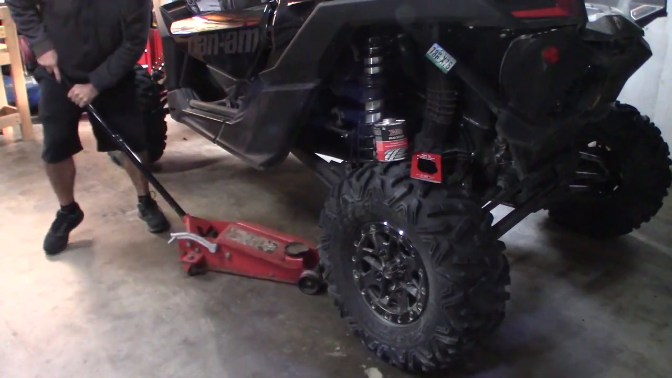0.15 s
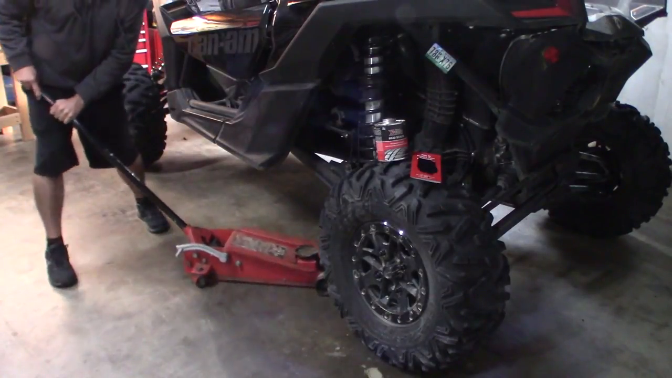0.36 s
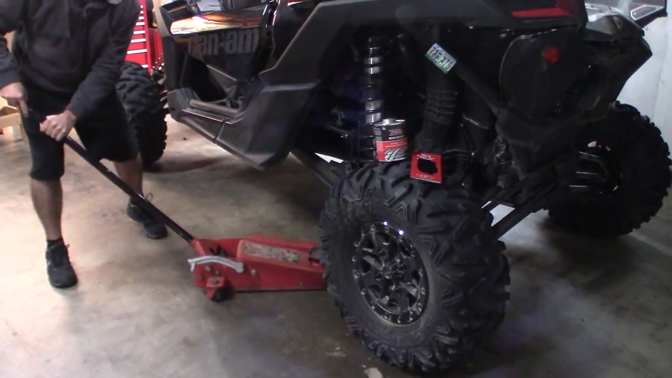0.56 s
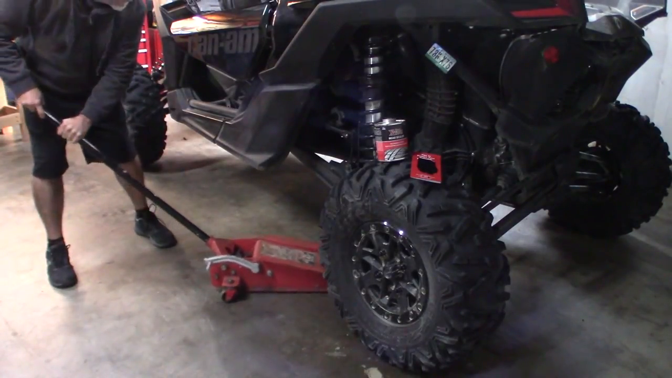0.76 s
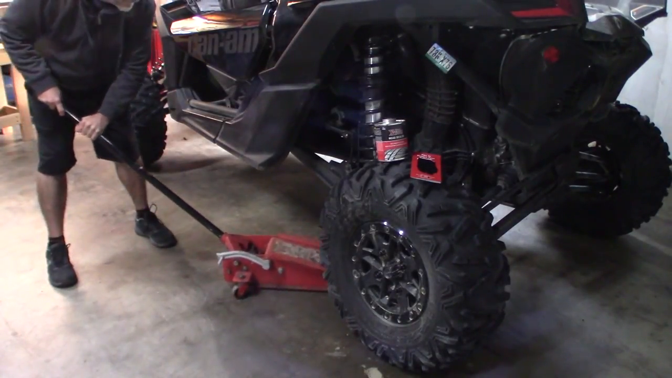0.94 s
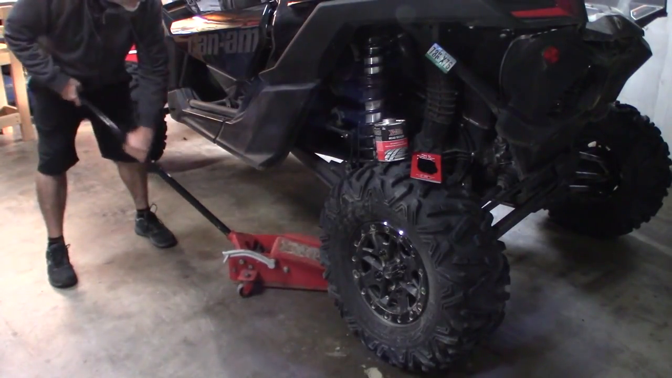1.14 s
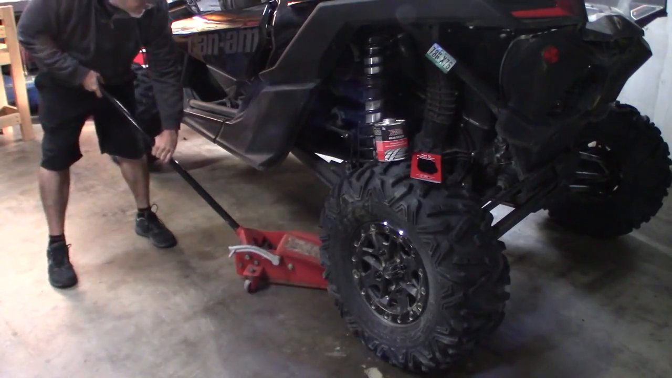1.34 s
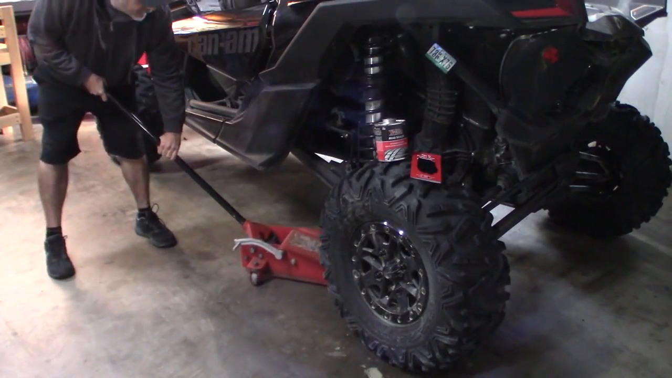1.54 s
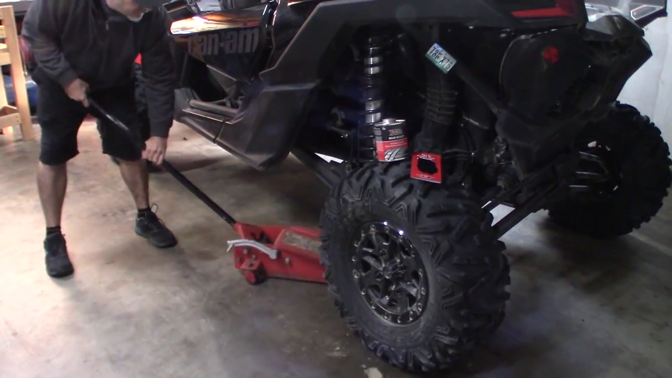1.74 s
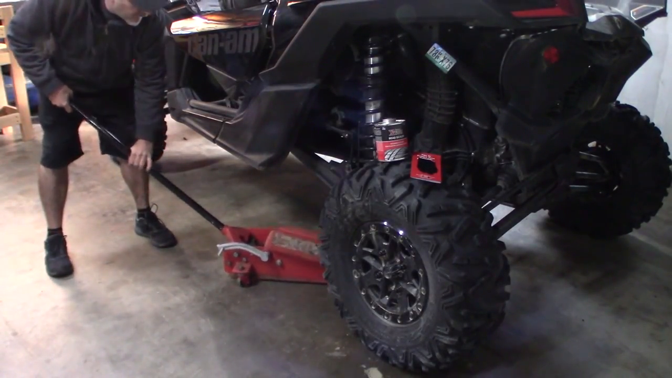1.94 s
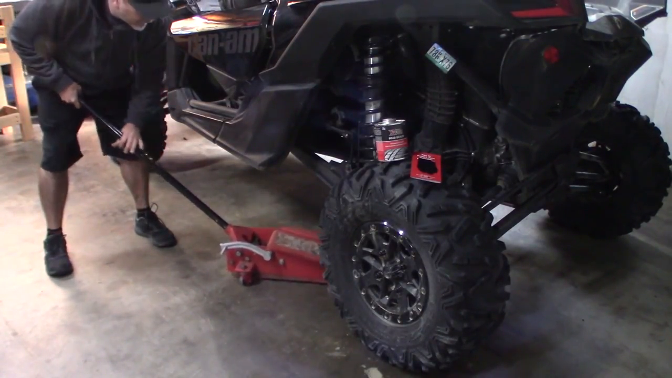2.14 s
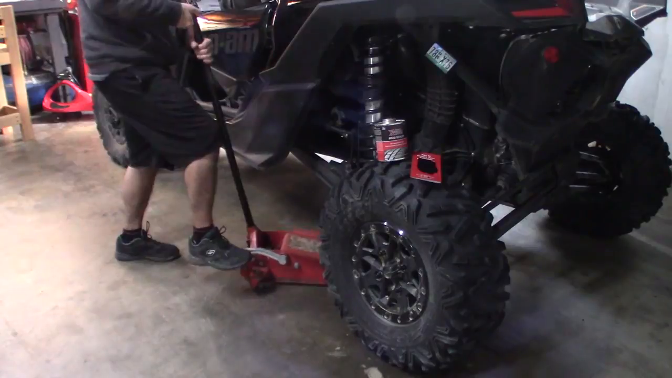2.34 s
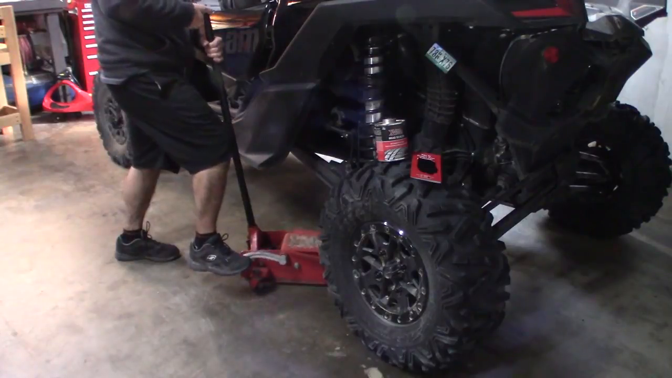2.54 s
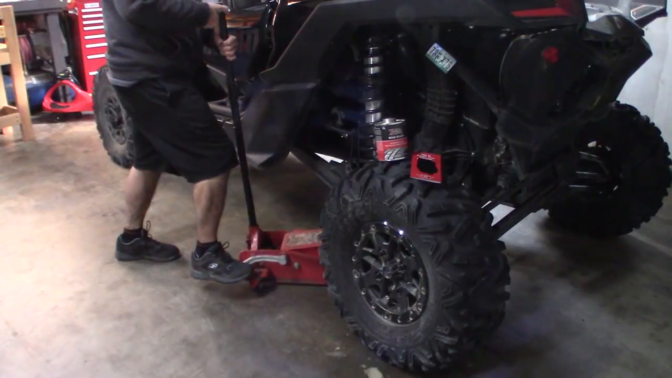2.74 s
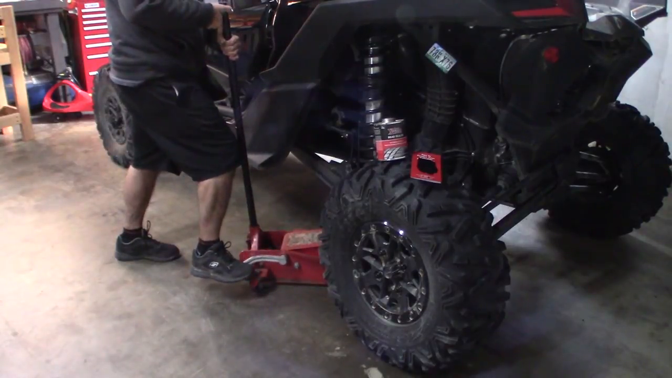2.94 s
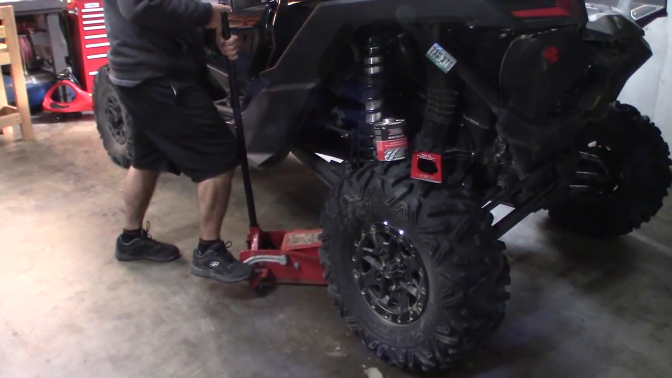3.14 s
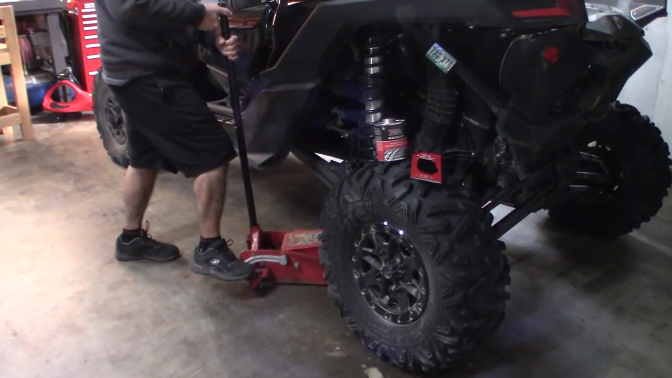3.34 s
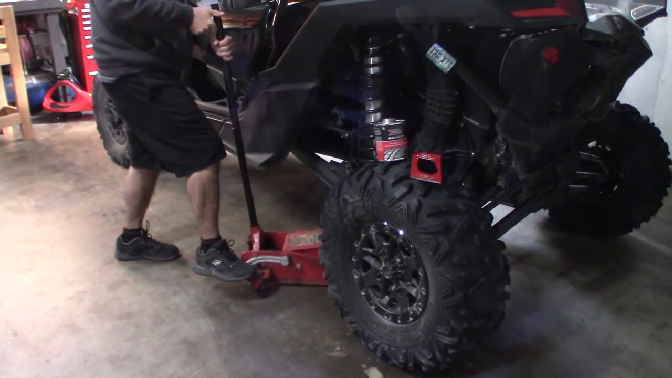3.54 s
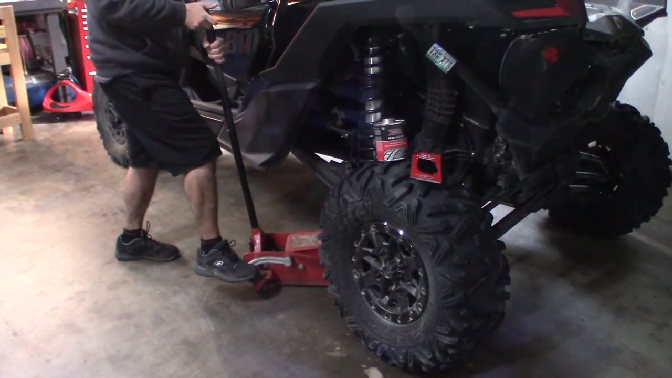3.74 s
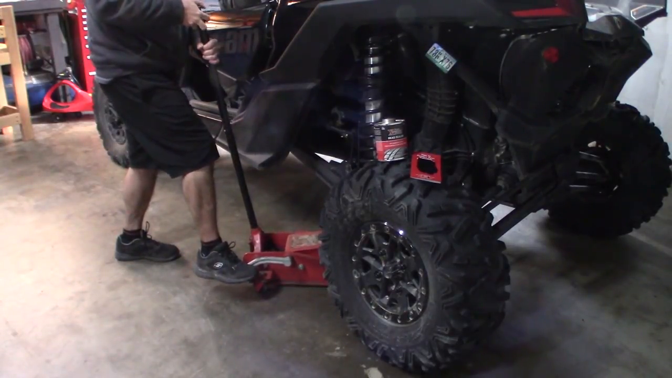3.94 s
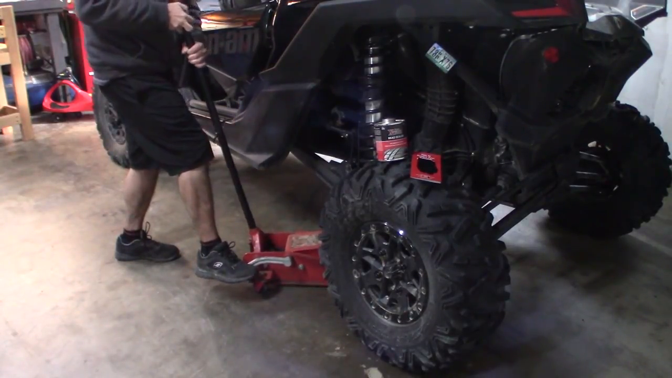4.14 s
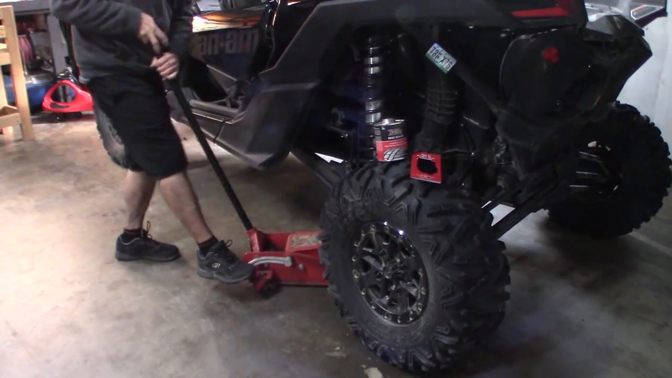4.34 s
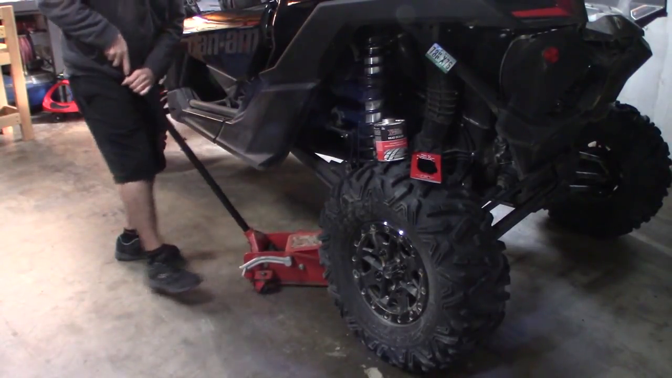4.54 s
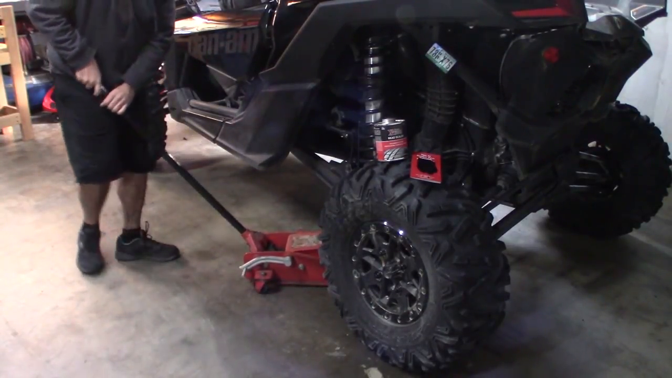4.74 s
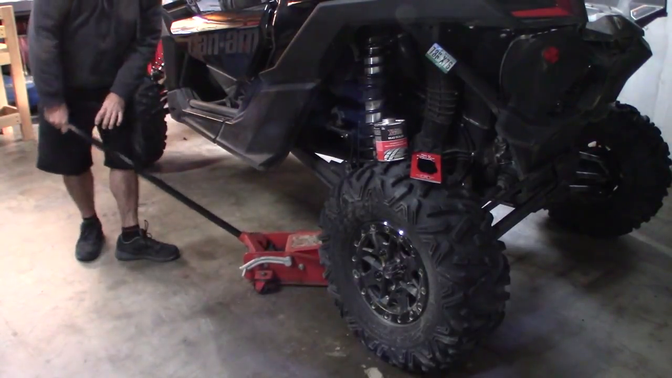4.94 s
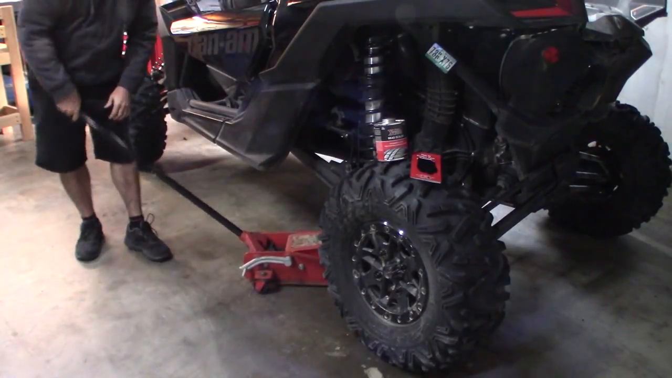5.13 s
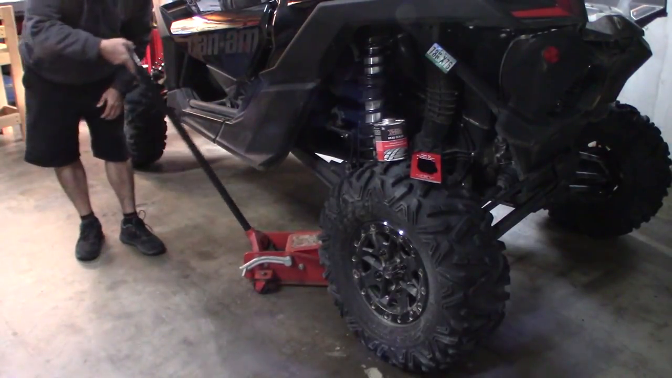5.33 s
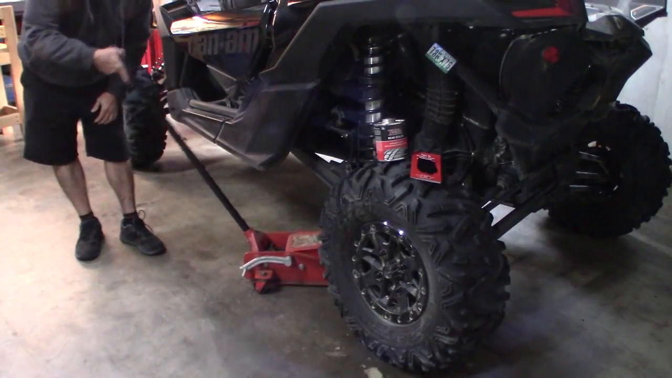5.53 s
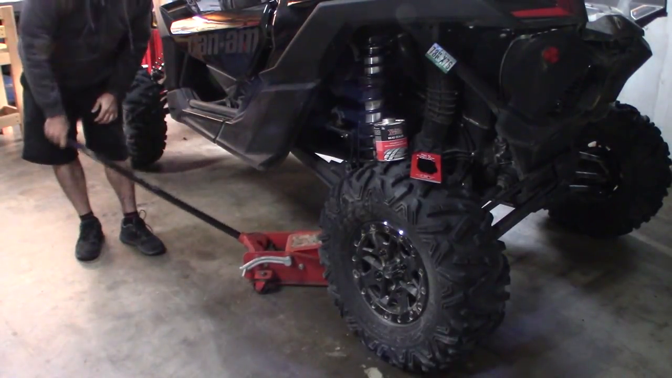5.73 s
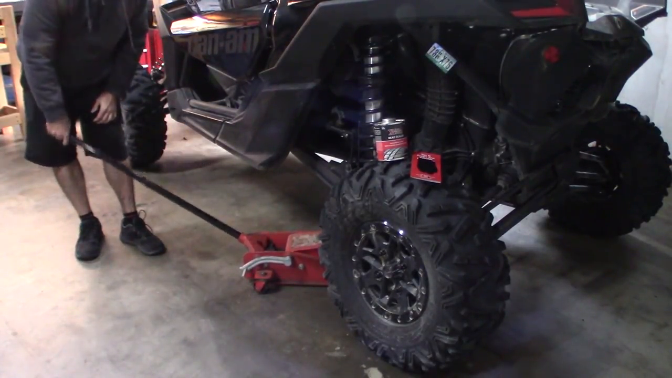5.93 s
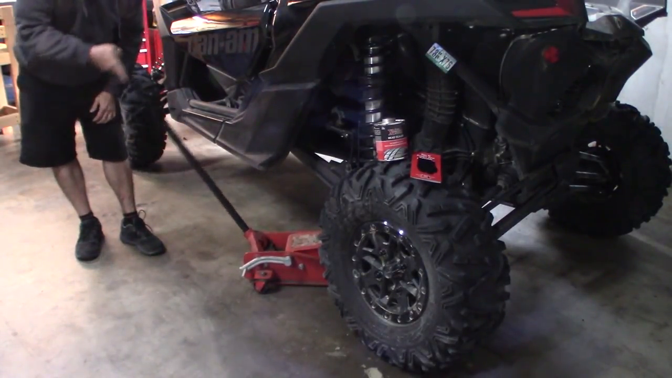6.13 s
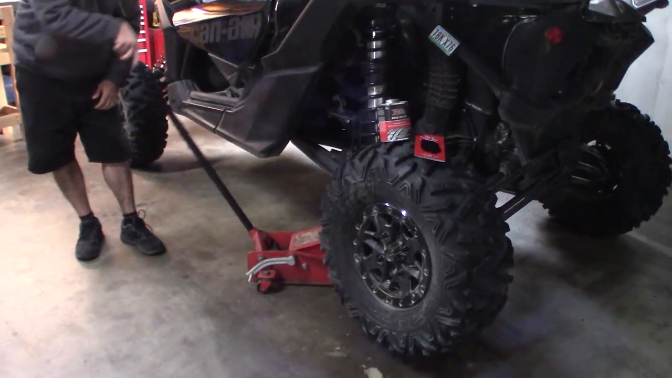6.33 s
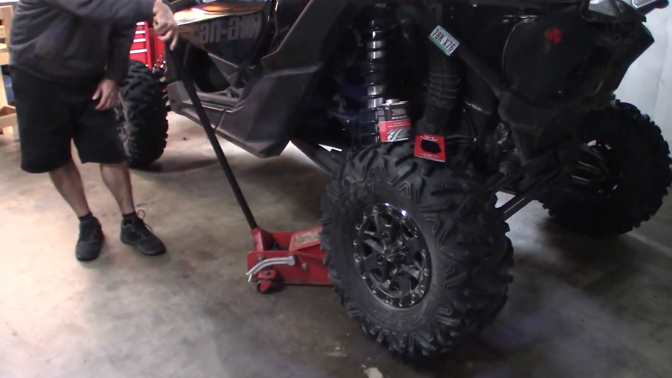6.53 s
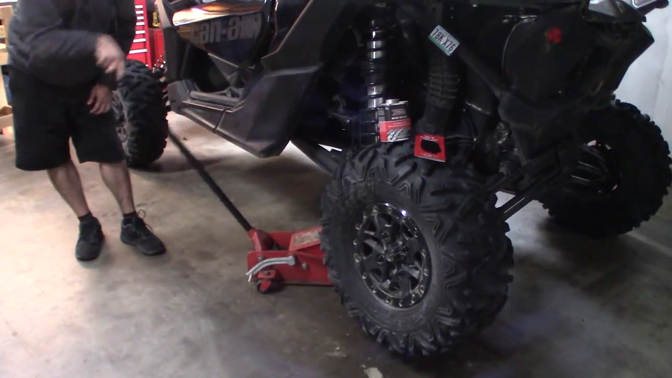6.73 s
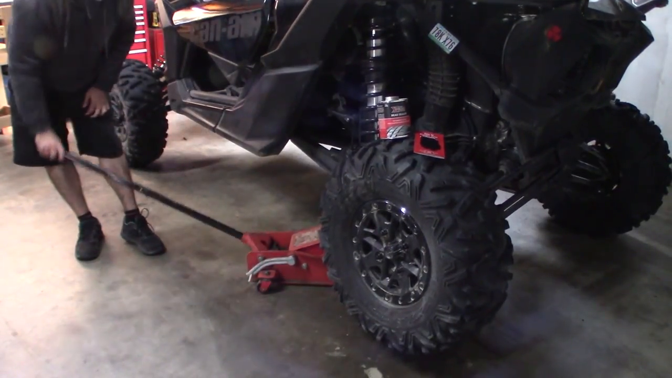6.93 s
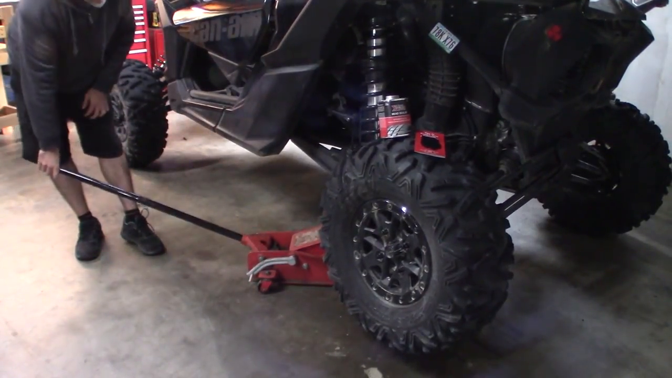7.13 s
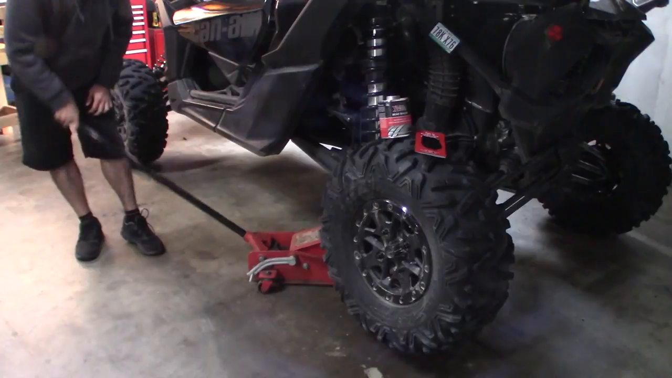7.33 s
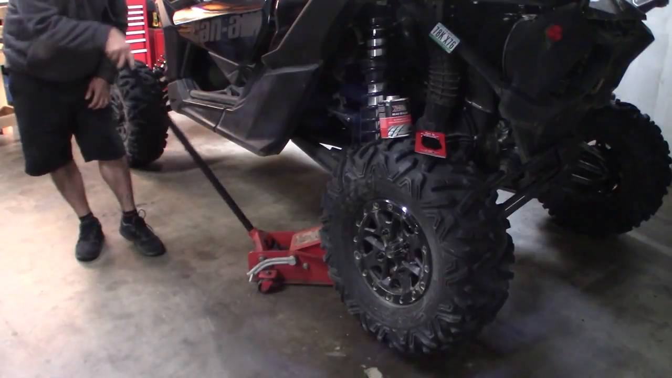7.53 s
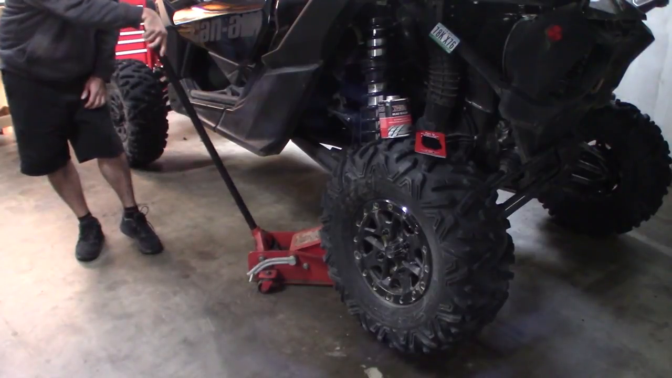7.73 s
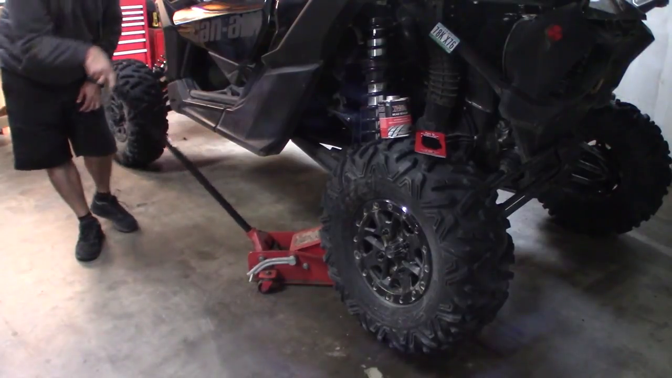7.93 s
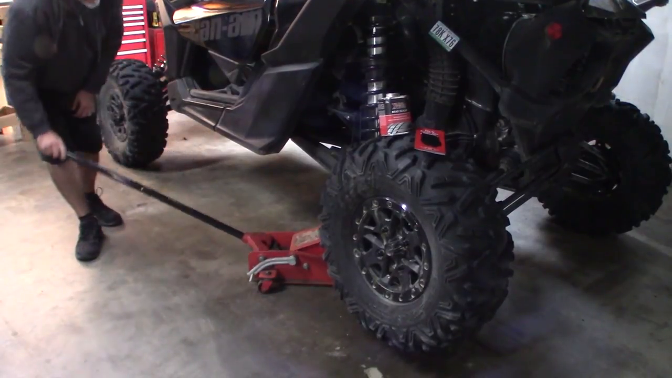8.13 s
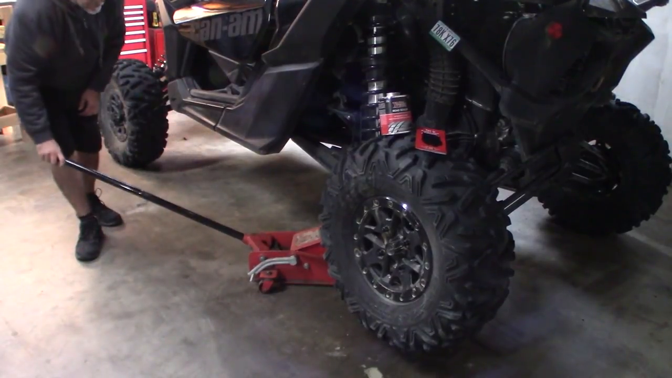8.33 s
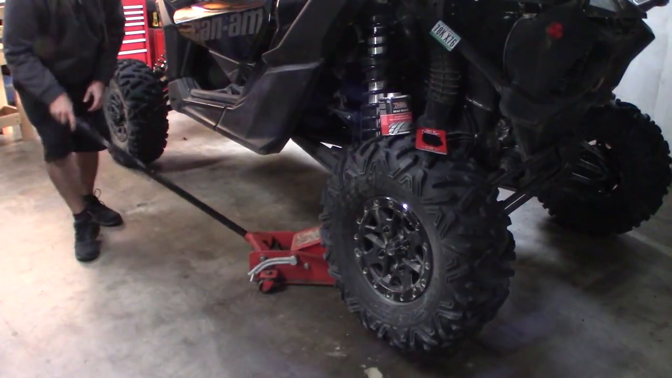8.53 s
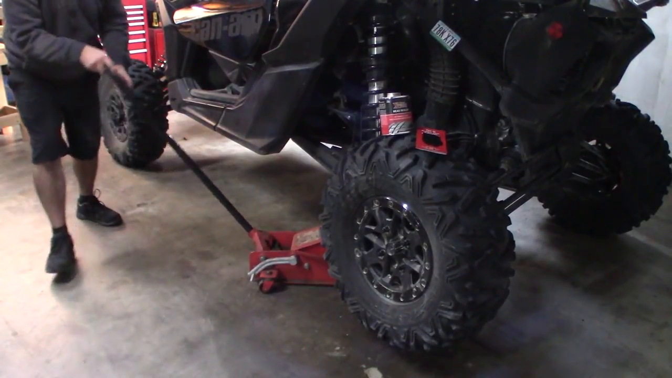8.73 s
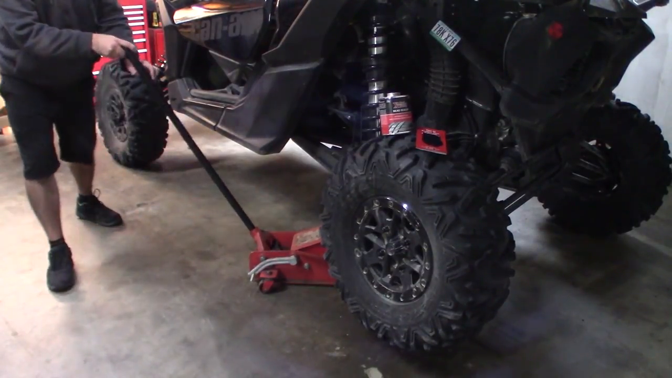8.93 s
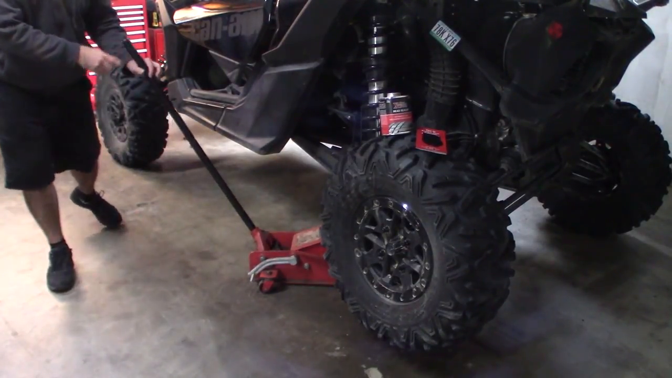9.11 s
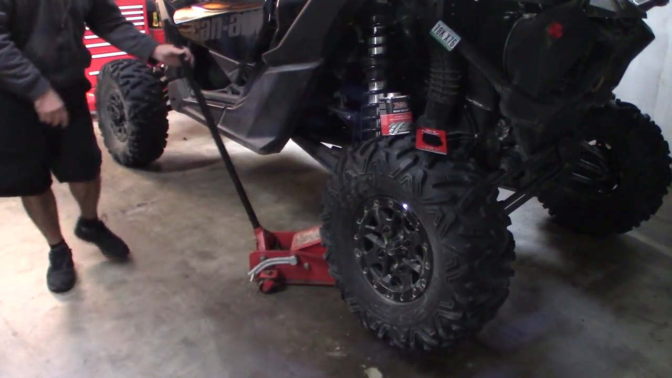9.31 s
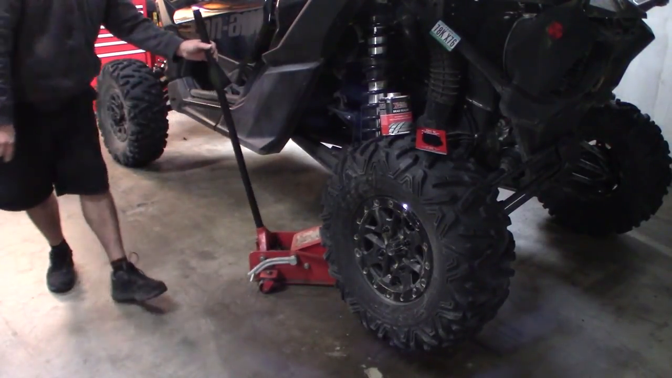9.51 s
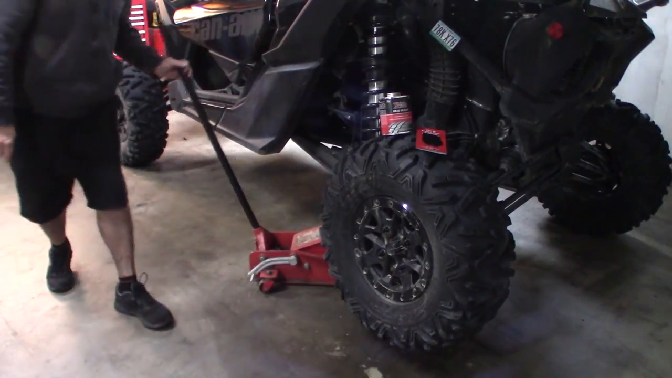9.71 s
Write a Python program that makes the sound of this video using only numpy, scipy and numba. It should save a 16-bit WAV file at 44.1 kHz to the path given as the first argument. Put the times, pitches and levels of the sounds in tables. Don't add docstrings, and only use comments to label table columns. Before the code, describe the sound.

A steel floor jack rattles across concrete on iron wheels, squeaks and bangs under a vehicle, then its handle is pumped with loose metallic clanks.

```python
import sys
import numpy as np
from scipy import signal
from scipy.fft import rfft, irfft, next_fast_len
from scipy.io import wavfile
from scipy.ndimage import uniform_filter1d, minimum_filter1d
from numba import njit

SR = 44100
rng = np.random.default_rng(int(sys.argv[2]) if len(sys.argv) > 2 else 0)


def unload_audio(sound):
    columns = np.transpose(np.atleast_2d(sound))
    steps = np.round(np.clip(columns, -1, 1) * 32767)
    wavfile.write(sys.argv[1], SR, steps.astype(np.int16))


def boost(x):
    u = np.asarray(x, float) / 20
    return 10 ** u


N = 430857
T = np.arange(N) / SR
GRIP_S, GRIP_DAMP = 6.315, 0.0525
FLAT = [(1, 0), (2, 0)]


def shape(x, table, lo_hz=1., hi_hz=29000.0):
    size = next_fast_len(x.shape[-1] + 2048)
    hz = np.fft.rfftfreq(size, 1 / SR) + 1
    point_hz, point_db = np.transpose(table)
    gain = boost(np.interp(np.log(hz), np.log(point_hz), point_db))
    edges = np.sqrt((1 + (lo_hz / hz) ** 12) * (1 + (hz / hi_hz) ** 12))
    return irfft(rfft(x, size) * gain / edges, size)[..., :x.shape[-1]]


def unit(x):
    return x / np.sqrt(np.mean(x ** 2, axis=-1, keepdims=True))


def ring(hz, t60, size):
    t = T[:size]
    return np.exp(2j * np.pi * np.outer(hz, t) - np.log(1000) * t / np.reshape(t60, (-1, 1)))


def cluster(hz, spread_hz, t60, size, count):
    offset, phase = rng.standard_normal((2, count))
    modes = ring(hz + spread_hz * offset, t60, size)
    return (np.exp(3j * phase) @ modes).imag / np.sqrt(count)


SCENE_S = [0, 2.378, 6.315, 9.78]


def add(out, s, x):
    i = int(s * SR)
    scene_end = int(min(e for e in SCENE_S if e > s) * SR)
    end = min(scene_end, N, i + len(x))
    out[i:end] += x[:end - i]


# f/Hz, level/dB
AIR_SPECTRUM = [(18, -54), (30, -8.5), (311, 6), (512, -3), (987, -3.5), (1810, -12), (2970, -16.5),
                (3220, -16.5), (4410, -18), (7650, -22), (11000, -27.5), (13000, -33), (16000, -38)]


def air():
    return boost(-49) * unit(shape(rng.standard_normal((2, N)), AIR_SPECTRUM, 65.1))


# f/Hz, T60/s
REVERBERATION = [(125, 0.68), (500, 0.55), (2000, 0.48), (6000, 0.41), (14000, 0.1312)]


def garage(dry):
    hz, t60 = np.transpose(REVERBERATION)
    t = T[:SR]
    tail = 0
    for f in 60 * 2. ** np.arange(9):
        noise = shape(rng.standard_normal((2, SR)), FLAT, f / np.sqrt(2), f * np.sqrt(2))
        tail = tail + noise * boost(-60 * t / np.interp(np.log(f), np.log(hz), t60))
    tail = tail * np.clip((t - .004) / 0.00049, 0, 1)
    tail /= np.sqrt(np.sum(tail ** 2, axis=1, keepdims=True))
    out = np.zeros((2, N))
    for start, end in zip(SCENE_S, SCENE_S[1:]):
        a, b = int(start * SR), min(int(end * SR), N)
        out[:, a:b] = signal.fftconvolve(dry[None, a:b], tail)[:, :b - a]
    return out


# f/Hz, level/dB
STEREO_WIDTH = [(60, -24), (110, -26), (200, -12.5), (380, -25), (700, -13), (1290, -10), (2380, -8.5),
                (4400, -7), (8120, -5), (15000, -9)]


def side_field(echo, air_noise, snap):
    return shape(boost(-10.0) * echo + air_noise, STEREO_WIDTH) + boost(-13) * snap


# f/Hz, level/dB, T60/s
BANG_MODES = [(135, -30, 2.0), (175, -35, 3.4), (206, -29, 4.4), (245, -41, 4.0), (287, -35, 2.6),
              (98, -38, 1.2), (421, -28, .6)]
# t/s, f/Hz, level/dB, T60/s
FAINT_RINGS = [(3.65, 125, -36, .6), (2.38, 5085, -48, .8), (2.385, 6530, -63, .9), (2.448, 10700, -62, .45),
               (7.314, 8600, -49, .55), (6.698, 7850, -54, .25), (3.82, 7600, -72, .9), (8.85, 7650, -70, .9)]


def long_rings():
    bang_s, size = 2.75, 3 * SR
    out = np.zeros(N)
    onset = np.minimum(T[:size] / 0.013, 1)
    for s, hz, db, t60 in [(bang_s, *mode) for mode in BANG_MODES] + FAINT_RINGS:
        count = 1 if s == bang_s else 8
        add(out, s, boost(db) * cluster(hz, .003 * hz, t60, size, count) * onset)
    return out


# t/s, f/Hz, level/dB, spread/f, T60/s
SINGING_PARTS = [(0.164, 1790, -26, 0.062, 0.13), (0.229, 2380, -27, 0.022, 0.0525),
                 (0.638, 1380, -24.5, 0.046, 0.063), (0.769, 1176, -22, 0.055, 0.16),
                 (0.81, 1126, -19.5, 0.03, 0.23), (1.585, 4900, -26.5, 0.066, 0.17),
                 (1.984, 7750, -26.5, 0.078, 0.105), (2.391, 1217, -53, 0.012, 0.44),
                 (2.738, 7200, -24, 0.022, 0.4), (3.823, 1300, -57, 0.059, 0.26),
                 (4.462, 1288, -25, 0.03, 0.26), (4.46, 686, -28, 0.073, 0.196),
                 (4.87, 2373, -31.5, 0.059, 0.17), (4.89, 1890, -37.5, 0.076, 0.34),
                 (5.211, 1004, -45, 0.044, 0.18), (5.77, 3560, -41.5, 0.0184, 0.47),
                 (5.77, 5455, -42.5, 0.0213, 0.26), (5.771, 7755, -41, 0.0306, 0.256),
                 (5.79, 2920, -41, 0.019, 0.208), (5.929, 1300, -39.5, 0.023, 0.233),
                 (5.935, 744, -44, 0.019, 0.45), (5.945, 7830, -48.5, .03, 0.27),
                 (5.947, 5280, -51.5, .02, 0.15), (6.035, 3600, -43.5, 0.038, 0.26),
                 (6.268, 5700, -46, 0.047, 0.26), (6.268, 7600, -49, 0.025, 0.32),
                 (6.259, 8480, -42.5, 0.031, 0.047), (6.757, 1745, -34, 0.06, 0.15),
                 (7.247, 1144, -39.5, 0.091, 0.28), (7.343, 3730, -47, 0.081, 0.433),
                 (7.946, 1300, -33, 0.0326, 0.59), (8.509, 1060, -40.5, 0.125, 0.42),
                 (8.563, 3420, -46, 0.07, 0.3), (8.562, 8700, -56, .02, .3), (8.58, 980, -39, 0.095, 0.21),
                 (9.432, 740, -44.5, 0.085, 0.161), (9.66, 1220, -40, 0.04, .3),
                 (0.657, 8400, -29, 0.043, 0.08), (0.667, 4900, -14, 0.051, 0.06),
                 (1.202, 8200, -36, 0.037, 0.13), (2.74, 1600, -20, 0.045, 0.65),
                 (2.735, 2910, -21, .03, 0.092), (2.74, 4600, -24, 0.024, 0.48), (2.74, 8190, -30, .02, .3),
                 (2.86, 330, -33, .08, .3), (4.235, 1380, -43.5, .08, 0.27), (4.222, 3100, -42, .08, .25),
                 (4.236, 600, -42, .15, 0.094), (9.108, 9900, -65, .1, 0.11),
                 (2.769, 6300, -31, 0.067, 0.216), (7.949, 993, -31, 0.061, 0.274),
                 (8.093, 3300, -48, 0.11, 0.67), (1.127, 8530, -63.5, .05, .2),
                 (1.09, 4680, -60, 0.051, 0.187), (1.06, 630, -36.5, 0.047, 0.113),
                 (2.76, 216, -22, 0.17, 0.332), (8.404, 7700, -52, .04, 0.25),
                 (8.84, 4300, -55, .04, 0.086)]


def singing():
    out, t = np.zeros(N), T[:SR // 4]
    f = np.fft.rfftfreq(len(t), 1 / SR)
    envelope = np.minimum(t / 0.0037, 1) * (1 - t / t[-1])
    for s, hz, db, spread, t60 in SINGING_PARTS:
        away = (f - hz) / (np.abs(spread) * hz)
        bands = np.exp(-away ** 2 / np.array([[4], [36]]))
        noise = rfft(rng.standard_normal((2, len(t))))
        core, flanks = unit(irfft(noise * bands, len(t)))
        note = core * boost(-60 * t / t60) + boost(-3.5) * flanks * boost(-110 * t / t60)
        add(out, s, boost(db + 13.0) * note * envelope)
    return out


def squeal(curve, partials, rough, throb_hz, throb_db):
    s, hz, db = np.transpose(curve)
    i = np.arange(int(s[0] * SR), int(s[-1] * SR))
    chance = rng.standard_normal((2, len(i)))
    waver, throb = unit(uniform_filter1d(chance, int(SR / throb_hz / 2)))
    phase = 2 * np.pi * np.cumsum(np.interp(T[i], s, hz) * (1 + rough * waver)) / SR
    tone = sum(boost(part_db) * np.sin(ratio * phase) for ratio, part_db in partials)
    out = np.zeros(N)
    out[i] = np.sqrt(2) * tone * boost(np.interp(T[i], s, db) + throb_db * throb)
    return out


# t/s, f/Hz, level/dB
CASTER_LOW = [(2.47, 1095, -52), (2.495, 1095, -42), (2.6, 1095, -46), (2.645, 1092, -24),
              (2.672, 1095, -38), (2.705, 1092, -29), (2.73, 1090, -38)]
CASTER_UPPER = [(2.582, 3150, -64), (2.6, 3150, -52), (2.635, 3145, -44), (2.672, 3140, -52),
                (2.72, 3140, -50), (2.732, 3140, -60)]


def caster():
    low = squeal(CASTER_LOW, [(1, 0), (2.01, -23)], .003, 25, 2.5)
    return low + squeal(CASTER_UPPER, [(1, 0)], .003, 25, 2.5)


# t/s, f/Hz, level/dB
SHOE_SQUEAK = [(2.235, 2840, -44.5), (2.245, 2860, -13), (2.255, 2754, -9.5), (2.367, 2909, -58),
               (2.375, 2670, -47)]


def shoe():
    partials = [(1, -3.0), (.88, -11.5), (2.03, -20), (2.95, -27), (3.9, -39)]
    return squeal(SHOE_SQUEAK, partials, 0.031, 220, 1.1)


# t/s, peak level/dB, centre f/Hz, T60/s
SNAPS = [(0.027, -24, 7000, 0.054), (0.309, -25.5, 7760, 0.051), (0.38, -23, 6900, 0.073),
         (0.465, -16, 8050, 0.069), (0.638, -10, 1500, 0.05), (0.659, -12, 6500, 0.027),
         (0.672, -16, 12000, .03), (1.204, -26.5, 11500, 0.034), (1.256, -14.5, 8000, 0.044),
         (1.987, -14.5, 9000, 0.036), (4.859, -19, 3000, 0.056), (0.751, -15.5, 11000, .03),
         (0.785, -15.5, 10000, 0.042), (0.825, -23.5, 12000, 0.0204), (0.913, -40, 11940, .02),
         (0.936, -26, 10000, 0.042), (0.987, -42, 11000, .02), (1.089, -43, 10000, 0.029),
         (1.127, -48.5, 9120, 0.075), (1.373, -22.5, 6500, 0.054), (1.404, -21, 6000, 0.052),
         (1.75, -35, 6000, .05), (1.798, -31.5, 6000, 0.072), (2.733, -6.5, 12000, 0.066),
         (4.377, -42, 5200, 0.09), (4.524, -25, 3500, 0.051), (4.74, -44, 8000, 0.04),
         (4.818, -41.5, 3500, 0.039), (4.852, -32, 4500, 0.056), (4.88, -12.5, 3670, 0.079),
         (5.04, -36, 4200, .05), (5.197, -23.5, 4600, 0.058), (5.462, -16.5, 2980, 0.039),
         (5.948, -41, 7000, 0.035), (6.245, -45, 3500, .04), (6.699, -38, 7800, .05),
         (7.509, -38, 3900, .04), (8.376, -38.5, 3200, 0.05), (8.83, -27.5, 840, 0.025),
         (8.913, -29, 1510, 0.0113), (8.962, -43, 2800, .04), (9.567, -43, 4000, 0.029),
         (9.598, -31, 587, 0.16), (9.655, -35.5, 3000, .06), (6.906, -26.5, 1200, 0.11),
         (6.94, -19.5, 895, 0.19), (7.03, -22.5, 800, .1), (8.135, -18, 682, 0.116),
         (8.172, -23.5, 795, 0.106), (8.245, -32, 990, 0.127)]


def ticks():
    out, t = np.zeros((2, N)), T[:SR // 10]
    for s, db, hz, t60 in SNAPS:
        burst = rng.standard_normal((2, len(t))) * boost(-60 * t / t60)
        snap = shape(burst, FLAT, hz / 1.5, min(hz * 1.5, 14800))
        for port, sound in zip(out, snap):
            add(port, s, boost(db) * sound / np.abs(sound).max())
    return out


# t/s, hold/s, level/dB, fall/(dB/s)
BODY_BOOMS = [
    (2.757, 0.029, -10.5, 120),
    (3.01, 0.225, -39, 23),
    (3.6, 0.031, -32, 71),
    (6.272, 0.022, -33.5, 69),
    (6.772, 0.044, -57, 71),
]


def boom(t):
    s, hold, db, fall = np.array(BODY_BOOMS)[:, :, None].transpose(1, 0, 2)
    below = np.maximum(900 * (s - t), fall * (t - s - hold))
    return boost(db - np.maximum(below, 0)).sum(axis=0)


# t/s, swell/s, hold/s, level/dB, scrape level re frame/dB
PLACING_RATTLES = [(0.473, 0.087, 0.009, -12, -12), (1.412, 0.063, 0.011, -22, 4.5),
                   (1.484, 0.0043, 0.0078, -14, 7), (1.981, 0.0047, 0.0052, -25.5, 11),
                   (2.38, 0.013, 0.24, -42.5, -6), (2.737, 0.0024, 0.073, -13.5, 10.5),
                   (3.395, 0.018, 0.0061, -43.5, -2), (3.596, 0.123, 0.0875, -36, -3.5),
                   (3.782, 0.055, 0.1, -60, -18), (4.249, 0.019, 0.127, -39.5, 0.5),
                   (4.46, 0.0424, 0.0072, -12, -11), (4.512, 0.038, 0.021, -22.5, -12),
                   (1.565, 0.032, 0.04, -17, -2.5), (2.03, 0.032, 0.032, -20, -1),
                   (2.503, 0.088, 0.205, -61, 5.5)]
PUMPING_RATTLES = [(4.88, 0.068, 0.0035, -30.5, 18), (5.042, 0.02, 0.083, -31.5, 6),
                   (5.246, 0.1, 0.037, -27.5, 12), (5.464, 0.0058, .005, -25, -13),
                   (5.615, 0.092, 0.0046, -14.5, -10.5), (5.786, 0.071, 0.0037, -20, -3),
                   (5.933, 0.0071, 0.0055, -15.5, -8.5), (6.049, 0.036, 0.0087, -22.5, -9),
                   (5.51, .02, 0.019, -29, -14), (6.2, .05, 0.14, -42.5, -21),
                   (6.762, 0.038, 0.0042, -6.5, -17), (6.86, 0.0156, 0.135, -28.5, -1),
                   (7.28, 0.35, 0.082, -26, -13), (7.8, 0.041, .005, -34, -13),
                   (7.946, 0.031, 0.0031, -11, -8.5), (8.11, 0.12, 0.16, -25.5, -8),
                   (8.52, 0.056, 0.075, -27, -8), (8.96, 0.069, 0.0089, -33.5, -4.5),
                   (9.45, 0.054, 0.0037, -39.5, -34.5), (9.68, 0.05, .1, -30, -12)]


def rattle(t, fall_db_s, strength_db):
    rattles = np.array(PLACING_RATTLES + PUMPING_RATTLES)
    s, swell, hold = rattles[:, :3, None].transpose(1, 0, 2)
    rise = 29 * (s - t) / np.maximum(swell, .002)
    below = np.maximum(np.maximum(rise, fall_db_s * (t - s - hold)), 0)
    return boost(strength_db[:, None] - below).sum(axis=0)


# t/s, rolling force level/dB
ROLLING_FORCE = [(0.0, -13.5), (0.13, -13), (0.175, -7.5), (0.22, -18.5), (0.414, -12), (0.614, -23),
                 (0.688, -3), (0.74, -24.5), (0.8, -6.5), (0.87, -23), (0.95, -23), (1.17, -47),
                 (1.225, -11.5), (1.276, -14), (1.394, -38), (1.522, -11.5), (1.628, -21), (1.748, -26.5),
                 (1.828, -12), (1.972, -30), (2.2, -45.5), (2.27, -28.5), (2.37, -17)]
# t/s, level/dB
HANDLE_SWAY = [(0.0, -6), (0.48, -8), (0.61, -48.5), (0.7, -0.5), (0.86, -15), (1.0, -22), (1.42, -17.5),
               (1.63, -29.5), (1.76, -5.5), (1.97, -8), (2.06, -67), (2.216, -12), (2.34, -10.5),
               (2.39, -24.5), (2.64, -54), (5.05, -57.5), (5.246, -32), (5.4, -32), (6.0, -38), (6.1, -22),
               (6.2, -43)]


def forces():
    t = T[::SR // 1000]
    s, _, _, db, scrape_db = np.transpose(PLACING_RATTLES + PUMPING_RATTLES)
    roll = boost(np.interp(t, *np.transpose(ROLLING_FORCE))) * (t < SCENE_S[1])
    sway = boost(np.interp(t, *np.transpose(HANDLE_SWAY))) * (t < HANDLE_SWAY[-1][0])
    thud_db = np.where(s < GRIP_S, -17.5, -10.5)
    frame = rattle(t, 188.5, db)
    thud = rattle(t, 86, db + thud_db) + roll * boost(-9.5) + boom(t)
    handle = frame * boost(-2) + sway
    scrape = rattle(t, 188.5, db + scrape_db) + roll * boost(-4.5)
    return [np.interp(T, t, gain) for gain in (frame + roll, thud, handle, scrape)]


# f/Hz, level/dB
TUBE_MODES = [(378, -16), (402, -8), (421, 0), (432, -12), (445, -4), (472, -15)]


def tube(x, damp=1.):
    hz, db = np.transpose(TUBE_MODES)
    response = boost(db) @ ring(hz, damp * .26, size=SR // 2).imag
    rings = signal.fftconvolve(x, response)[:len(x)]
    return signal.sosfilt(signal.butter(2, (330, 560), "band", fs=SR, output="sos"), rings)


# f/Hz, bandwidth/Hz, level/dB
STEEL_MODES = [(1055, 9.5, -43.5), (1300, 16, -4.5), (1828, 82, 7.5), (2300, 110, -7.5), (2650, 55, -40),
               (3287, 26, -33.5), (3940, 86, -43), (4570, 120, -44), (5600, 180, -12), (5950, 15, 3.5),
               (7200, 69, -5), (8250, 80, -5), (10700, 120, -8.5)]


def frame_modes(detune=0.94):
    hz, width, db = np.transpose(STEEL_MODES)
    decay_s = np.clip(3.0 / width, .02, .07)
    return boost(db - db.max())[:, None] * ring(hz * detune, decay_s, size=SR // 4)


# f/Hz, level/dB
STEEL_COLOUR = [(29, -94.5), (50, -31.5), (134, -19.5), (328, -16), (428, -11.5), (558, -2), (904, -5),
                (1120, -2), (4780, -15.5), (6700, -25.5), (8740, -26), (12900, -43), (16000, -68.5)]
# f/Hz, level/dB
GRIT_COLOUR = [(3000, -6), (6500, 2), (10000, -7.5), (13500, -8), (15500, -28)]


def chatter():
    frame, thud, handle, scrape = forces()
    chance = rng.standard_normal((3, N))
    fast = unit(uniform_filter1d(chance[1], size=300))
    slow = unit(uniform_filter1d(chance[2], size=1800))
    knocks = chance[0] * (rng.random(N) < .2) * boost(1.363 * fast + 2.6 * slow)
    rings = signal.fftconvolve(knocks, frame_modes().imag.sum(axis=0))[:N]
    steel = unit(knocks) + boost(-19.0) * unit(rings)
    out = np.zeros(N)
    for lo, hi, gain in ((85, 370, thud), (480, 2500, frame), (2500, 2e4, scrape)):
        out += unit(shape(steel, STEEL_COLOUR, lo, hi)) * gain
    grit = knocks * boost(2.5 * unit(uniform_filter1d(chance[2], size=200)))
    fizz = unit(shape(grit, GRIT_COLOUR)) * (T < 2.2)
    out += fizz * scrape * boost(-13.5)
    jolts = chance[2] * (rng.random(N) < 500 / SR)
    free, held = (tube(jolts * handle, damp) / tube(jolts, damp).std() for damp in (1., GRIP_DAMP))
    return boost(-9.5) * (out + np.where(T < GRIP_S, boost(-4.0) * free, held))


# t/s, peak level/dB, handle, clink and tick
# level re peak/dB
FREE_BLOWS = [(0.232, -11.5, -36, 5, -4), (0.471, -4.5, 0, 4, 0.5), (0.555, -4.5, -12.5, -49.5, -33.5),
              (0.641, -6.5, -9, -17, -32.5), (0.661, -22.5, -39.5, -13.5, 12),
              (0.672, 21.5, -11, -3, -15.5), (0.766, 2.5, -6, -18.5, -32),
              (1.191, -17, -15, -30.5, -31.5), (1.205, -18, -31.5, -20, 6.5),
              (1.213, -14, -7.5, -7.5, -11.5), (1.262, -4.5, -11.5, -9, -8), (1.412, -8, -15, -12, -3),
              (1.486, 5.5, -16, -4, -30), (1.584, -13.5, 2, -12.5, -16.5), (1.982, 2, -37.5, 13, -47),
              (2.733, 12.5, -19.5, 6, -10), (3.219, -66, -53, -20.5, 24), (3.821, -42, -16.5, 10, -8.5),
              (3.59, -21, -16.5, -15, -35), (3.927, -32, -5.5, -36.5, -23.5), (4.22, -16, -23, 4.5, -58),
              (4.457, -11, -9, -3, -38.5), (4.468, -17.5, -17, 8.5, -70.5),
              (4.862, -34.5, -54, 26, -44), (4.964, -26, -13.5, -7, -3), (5.129, -23, -8, -19, -15),
                (5.212, -20, -4.5, 4, -1.5), (5.461, -4, -8, -6, -12), (5.588, -17, -12.5, -4, -10),
                (5.776, -15, -10, 2, -16), (5.927, -12.5, -19, -8, -18), (6.034, -24.5, -4, -14, -2),
                (6.259, -25.5, -11.5, 1, -4), (6.288, -36, -13, -8.5, -20)]
# t/s, peak level/dB, thud, clink and tick level re peak/dB
GRIPPED_STROKES = [(6.419, -36, -23, 5, -19.5), (6.659, -31.5, 2, 0.5, -1.5), (6.747, -18, -20, 11, -2),
                   (7.001, -22.5, -3, -19.5, -23.5), (7.183, -25, -4.5, -3, -30),
                   (7.248, -13.5, -25, -5.5, -48.5), (7.316, -36, -28, -8, 10), (7.346, -16, -14, -28, -6),
                   (7.791, -29, -13, -27, -19), (7.93, -17.5, -35, -13.5, -3),
                   (7.948, -17.5, -3.5, 11.5, -46), (8.084, -30, 10, 6, 0), (8.403, -25.5, 2.5, 4.5, -5.5),
                   (8.506, -25.5, -26.5, -31.5, -3), (8.564, -22.5, -39.5, -22, 2),
                   (8.831, -30, 4, 1, -1.5), (8.911, -27.5, 6, 1, -32.5), (7.556, -42, 0, 10, 5),
                   (9.109, -52, -20, 5.5, 10), (9.758, -30.5, -19, 9, -13), (9.429, -37, 9.5, -30, -30),
                   (9.63, -33.5, 3, -27, -10.5), (9.66, -17, -6, -6, -11)]


def blows():
    free = [(s, db, -19.5, handle, clink, tick) for s, db, handle, clink, tick in FREE_BLOWS]
    return free + [(s, db, thud, -11.5, clink, tick) for s, db, thud, clink, tick in GRIPPED_STROKES]


BAND_EDGES = [85, 370, 480, 2500, 6000, 17000]


def clanks():
    out, t = np.zeros(N), T[:SR // 4]
    for s, peak_db, thud_db, handle_db, clink_db, tick_db in blows():
        spot = rng.standard_normal((3, len(STEEL_MODES)))
        noise = rng.standard_normal((2, len(t)))
        rings = ((spot[0] + 1j * spot[1]) @ frame_modes(1 + 0.0243 * spot[2])).imag
        decay = 0.2 * np.exp(-t / 0.0014) + np.exp(-t / 0.017) + 0.77 * np.exp(-t / 0.083)
        steel = noise[0] * decay + 1.5 * rings / np.abs(rings).max()
        steel = steel * np.minimum(t / .002, 1)
        thud = shape(noise[1] * t * np.exp(-t / 0.021), STEEL_COLOUR, *BAND_EDGES[:2])
        handle = tube(np.exp(-t / 0.0055), 1. if s < GRIP_S else GRIP_DAMP)
        frame, clink, tick = (shape(steel, STEEL_COLOUR, BAND_EDGES[k], BAND_EDGES[k + 1]) for k in (2, 3, 4))
        layers = [(frame, -3.0), (clink, clink_db - 10.0), (tick, tick_db - 5.0),
                  (thud, thud_db - 6.0), (handle, handle_db + 6.0)]
        for band, db in layers:
            add(out, s - .001, band * (1 - t / t[-1]) / np.abs(band).max() * boost(peak_db + db))
    return out


def scene():
    snaps = ticks()
    dry = chatter() + clanks() + singing() + caster() + shoe() + snaps[0]
    dry = shape(dry, FLAT, lo_hz=75.)
    echo, air_noise = garage(dry), air()
    mid = dry + boost(-7.5) * echo[0] + air_noise[0] + long_rings()
    side = side_field(echo[1], air_noise[1], snaps[1])
    lean = .027 * mid
    return np.array([mid + side + lean, mid - side - lean])


@njit
def follow(x, release):
    e, out = 0., np.empty(len(x))
    for i in range(len(x)):
        e = max(x[i], e * release)
        out[i] = e
    return out


def top_cut(x):
    return signal.sosfilt(signal.butter(12, 15830, fs=SR, output="sos"), x)


def record(dry):
    limit_db, release_s, top_hz = -.6, .035, 15700
    dry = signal.sosfilt(signal.ellip(8, .3, 60, top_hz, fs=SR, output="sos"), dry)
    peak = -minimum_filter1d(-np.abs(dry).max(axis=0), size=89)
    gain = np.minimum(1, boost(limit_db) / follow(peak, np.exp(-1 / (release_s * SR))))
    return top_cut(dry * uniform_filter1d(gain, size=45))


dry = scene()
out = record(dry)
unload_audio(out)
```